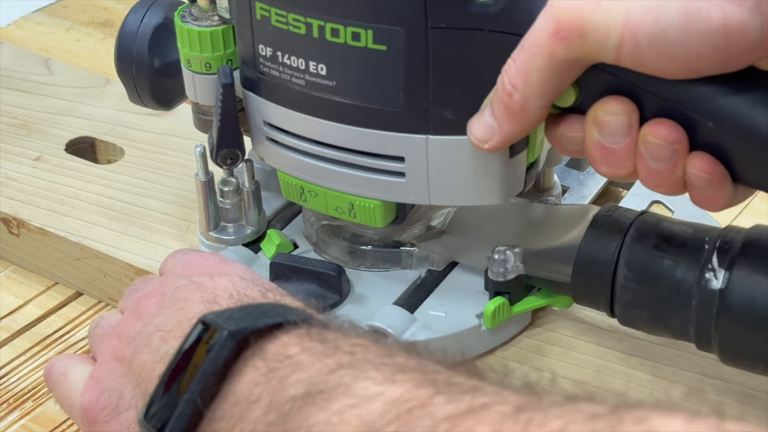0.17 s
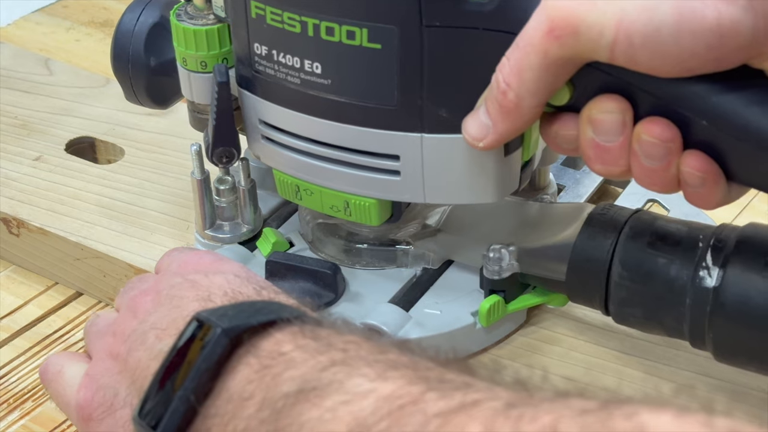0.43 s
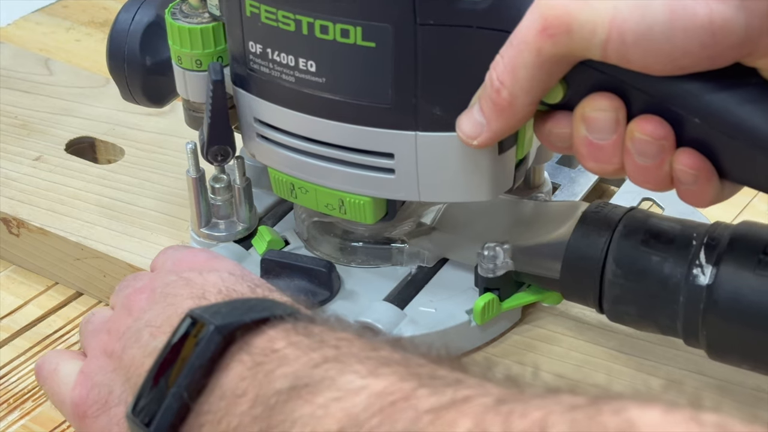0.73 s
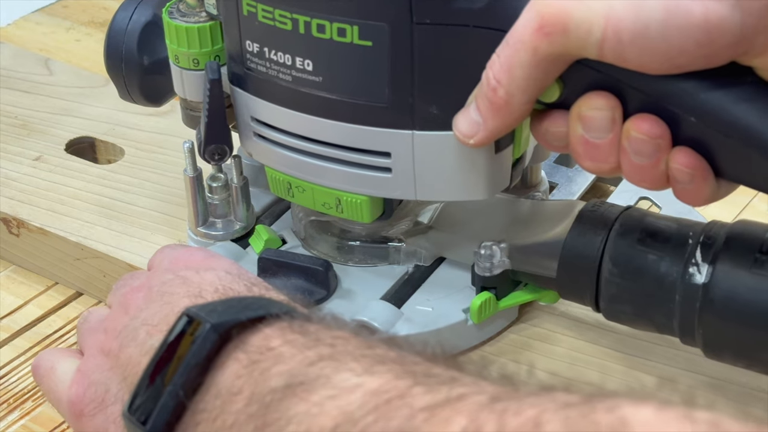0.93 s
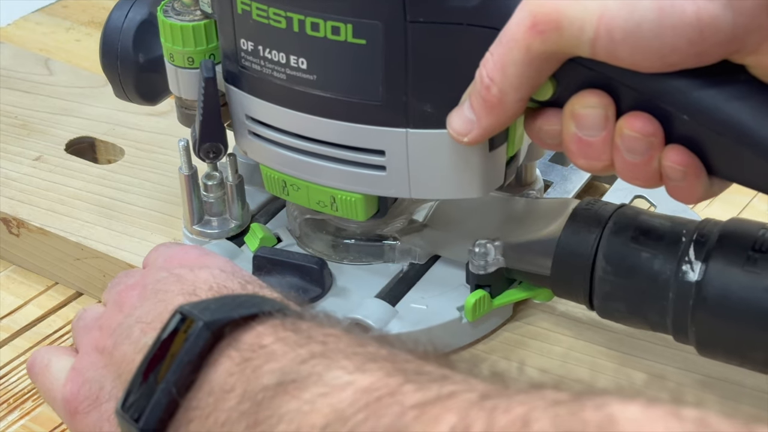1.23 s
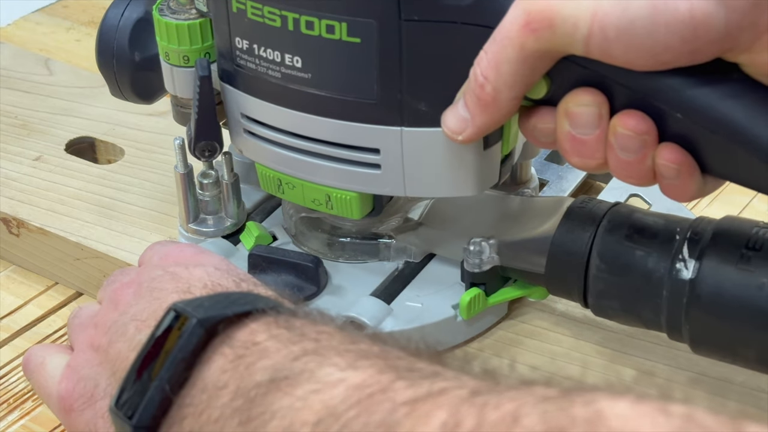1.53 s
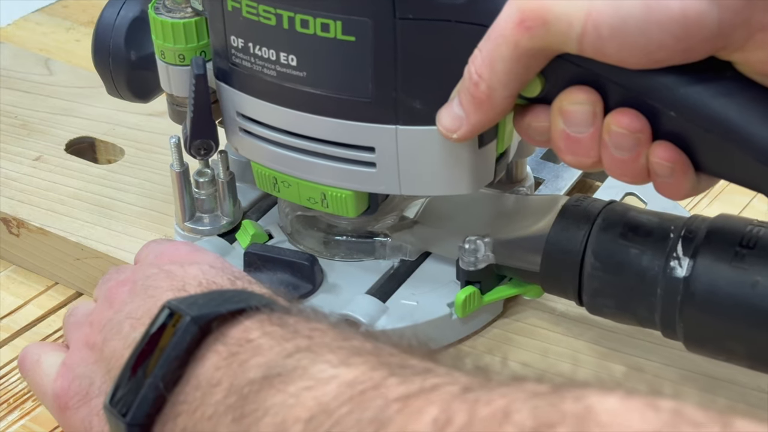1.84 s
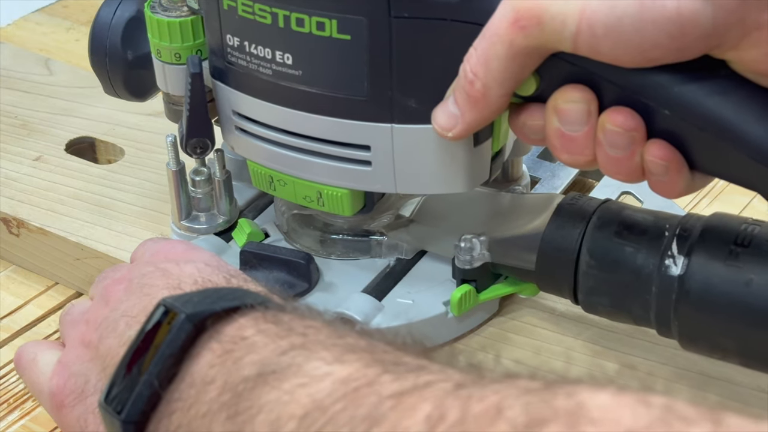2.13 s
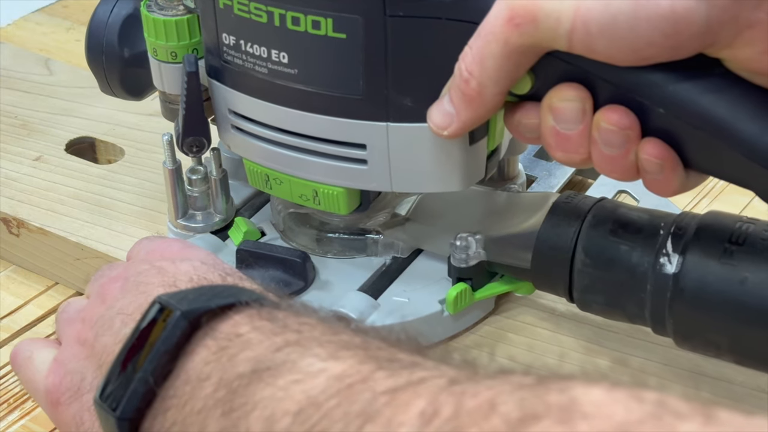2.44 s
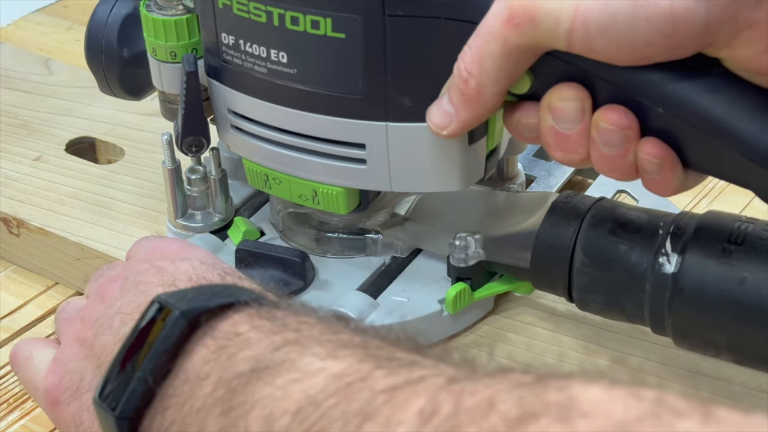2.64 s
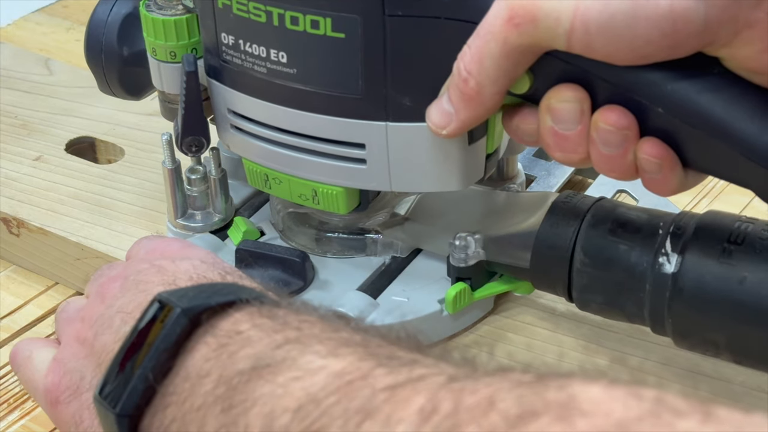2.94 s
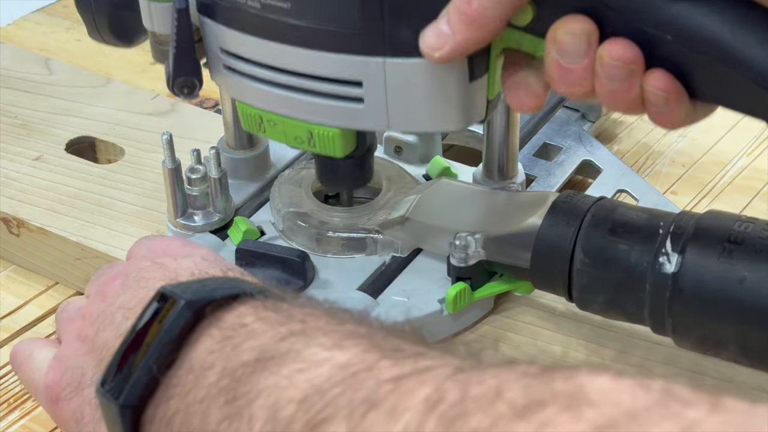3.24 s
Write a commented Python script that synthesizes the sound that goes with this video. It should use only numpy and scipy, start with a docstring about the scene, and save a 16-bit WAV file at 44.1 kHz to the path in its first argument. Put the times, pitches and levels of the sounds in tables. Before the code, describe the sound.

Close up and dry, a wood router shrieks at one high pitch amid cutting hiss. After brief stutters the shriek cuts off; quieter motor whine and rushing air remain, lightly squeaking, then start to sink.

```python
"""Plunge router cutting a slot

Close up in wood, the cutter chatters in a shrill whistle: partials with sidebands at its turning rate.
Shaft orders of motor and bearings sound through housing resonances; extraction air and cutting hiss
are shaped noise. The whistle stutters and stops as the cut ends, two faint ticks sound, and light
grazes bring rough squeaks. The router is then switched off and starts to wind down."""
import sys
import numpy as np
from scipy import signal
from scipy.fft import rfft, irfft
from scipy.io import wavfile

SR = 44100
rng = np.random.default_rng(int(sys.argv[2]) if len(sys.argv) > 2 else 0)


def master(y):
    """Save y as 16-bit WAV."""
    cut = np.clip(np.atleast_2d(y).T, -1, 1)
    pcm = np.round(cut * 32767)  # scale
    wavfile.write(sys.argv[1], SR, pcm.astype(np.int16))


N = 149940
T = np.arange(N) / SR  # time [s]
HZ = np.fft.rfftfreq(N, 1 / SR)  # frequency bins [Hz]

# Feed of the cutter, heard in the whistle: (time [s], strength [dB], pitch [Hz])
FEED_CURVE = [(0, -3, 2131), (.3, -0.26, 2131), (.55, 2, 2127), (.66, 0.13, 2127), (.88, -0.44, 2130),
              (.98, -0.58, 2135), (1.08, 1.5, 2125), (1.2, -0.46, 2126), (1.4, 0.9, 2128),
              (1.72, -0.64, 2129), (2.08, -1.4, 2130), (2.31, -1.5, 2131), (2.39, 0.97, 2125),
              (2.46, 0.9, 2122)]
# Stalls of the whistle: (time [s], depth [dB], nominal half length [s], overshoot [dB])
WHISTLE_STALLS = [(0.864, 2.5, 0.0058, 0), (0.915, 1.5, 0.0088, 1.4), (2.119, 5, 0.0095, 2.5),
                  (2.17, 17, 0.014, 6), (2.211, 10, 0.0094, 3), (2.251, 8, 0.0072, 3),
                  (2.289, 3, .008, 1.5)]
# Partials and cutter sidebands:
# (whistle harmonic [-], added shaft order [-], level at time 0 [dB], change along the cut [dB/s])
WHISTLE_PARTIALS = [(1, 0, 0, 0), (1, -1, -30.5, 0.5), (1, 1, -14.5, -0.9), (1, 2, -29.5, 0.5),
                    (1, 4.13, -24.5, 0), (2, -1, -23.5, -1.5), (2, 0, -13, -1), (2, 1, -29, -3),
                    (2, 2, -40, 5), (3, -1, -27, -1.5), (3, 0, -9.5, -0.54), (3, 1, -21.5, 0.4),
                    (3, 2, -46, -2), (3, 3, -28, 0), (3, 4.02, -14.5, -9), (4, -1, -41, -10),
                    (4, 0, -15.5, -0.5), (4, 4, -27, -2), (5, 0, -14.5, -1.5), (6, 0, -26, -3),
                    (7, 0, -39, 0)]
# Motor and bearing tones: (shaft order [-], cutting [dB], running free [dB], coasting [dB])
SHAFT_ORDERS = [(1, -61.5, -58.5, -57), (2, -64, -55.5, -65), (3, -66, -68, -71), (4, -65.5, -64, -60.5),
                (4.13, -62.5, -63, -61), (5, -81, -73, -65), (6, -84, -55, -57.5), (8, -74, -70.5, -72),
                (8.13, -72, -66, -78), (12, -69, -65, -79)]
# Waver of the whine once the cutter runs free: (time [s], added level [dB])
WHINE_WAVER = [(2.5, -1), (2.6, 0.5), (2.7, 0), (2.76, -10), (2.83, -7), (2.93, 1.5)]
# Housing resonances that the tones slide through: (frequency [Hz], width [Hz], gain [dB])
HOUSING_RESONANCES = [(328, 5, -5), (344, 11, 7.5), (1386, 13, 10), (2170, 35, 3.5)]
# Spectrum of fan and extraction air: (frequency [Hz], relative density [dB per Hz])
AIR_SPECTRUM = [(25, -49), (65, -32.5), (120, -24), (250, -17.5), (400, -14), (700, -9), (1000, -6.5),
                (1300, -12), (1700, -12.5), (2400, -10.5), (3600, -11), (4600, -14.5), (5000, -16.5),
                (5600, -13), (7500, -14), (8700, -11), (10400, -13), (11400, -15), (13400, -28),
                (14700, -17.5), (15500, -21.5)]
# Air resonances in the dust hood: (frequency [Hz], width [Hz], gain on the air noise [dB])
HOOD_RESONANCES = [(1825, 88, 2.5), (2170, 110, 3.5), (3380, 180, 2.5), (6490, 280, 6)]
# Spectrum of the cutting hiss: (frequency [Hz], relative density [dB per Hz])
CUT_SPECTRUM = [(30, -42), (120, -15), (300, -21), (600, -3.5), (1100, -0.5), (2000, -3.5), (3500, -3.5),
                (4300, -6.5), (4750, -2), (5000, 0.5), (5250, -1.5), (6500, -2.5), (8000, -0.3),
                (10500, 0.6), (12000, -10), (13400, -1.5), (15500, -12)]
# Cutting hiss before pulsing and swell: (time [s], level [dB])
HISS_LEVEL = [(0, -45.5), (.4, -42), (1.0, -42.5), (1.5, -44.5), (2.1, -43.5), (2.4, -43)]
# Short noise ticks: (time [s], level [dB])
NOISE_TICKS = [(2.183, -37), (2.439, -45)]
# Grazes of the slot wall after the cut: (time [s], half length [s], level [dB])
WALL_GRAZES = [(2.525, 0.065, -57), (2.668, 0.045, -58), (2.805, 0.0088, -45)]
# Tones of a graze: (frequency [Hz], relative level [dB])
GRAZE_TONES = [(2160, 0.5), (2495, -1)]
# Phase between left and right, opposite in the high treble: (frequency [Hz], lead of left [rad])
LEFT_LEAD = [(300, 0), (560, 0.52), (800, 0.1), (1150, 0.3), (1450, 0), (4650, 0), (4850, -.9),
             (4980, -2.6), (5080, 0), (6850, 0), (7900, -0.98), (10600, -2.4), (10900, -2.95),
             (11400, -3.14), (14500, -3.14), (15500, -3.6)]
# Likeness of the noise in left and right: (frequency [Hz], likeness [0-1])
STEREO_LIKENESS = [(300, 1), (400, .96), (560, .88), (800, .97), (1150, .93), (1450, 1), (4650, 1),
                   (4950, .45), (5120, 1), (5600, .998), (6100, .99), (6400, 1), (6850, .995), (7600, .66),
                   (10600, .64), (11400, 1), (14500, 1), (15400, .55)]

CUT_END_S, CUT_FADE_S = 2.472, 0.0023
OFF_S, POWER_FADE_S = 2.96, 0.029  # switch-off; crossfade to the coasting levels
COAST_S, COAST_DB_PER_S = 4.35, 18  # time constant of the run-down; fade of the motor tones
SHAFT_HZ, FREE_HZ = 363.3, 365.2  # turns a second: cutting at 0 dB strength, and running free
LOAD_HZ_PER_DB = 0.74  # the shaft slows as the cutter bites harder

WHISTLE_DB = -32.5
MAIN_FLUTTER, SIDEBAND_FLUTTER, OVERTONE_FLUTTER = .035, 0.16, 0.14  # share of amplitude
REBOUND_LAG = 1.4  # the overshoot comes this many half lengths after the dip
STALL_SKEW = 0.22  # a stall sets in slowly and ends abruptly
STALL_HZ_PER_DB = 0.94  # pitch dips with each stall and rises with its overshoot
OVERTONE_FOLLOW = 0.54  # share of the whistle's swell that its overtones follow
OVERTONE_DIP, OVERTONE_REBOUND = 1.15, 0.34  # deeper fall and smaller overshoot [dB per dB]

WHINE_ORDER = 6
AIR_DB, AIR_SPEED_DB = -44, 45  # level running free; dB per tenfold shaft speed
CUT_FOLLOW = 0.44  # the hiss follows feed and stalls [dB per dB]
TICK_DECAY_S = 0.0095
GRAZE_ROUGH_RAD = 0.95  # rms phase jitter
EDGE_HZ = 15750


def amp(db):
    """Logarithmic level law: decibels become an amplitude factor."""
    return 10 ** (np.asarray(db) / 20)


def evened(x):
    """Mean-square normalization: the rms becomes 1."""
    return x / np.sqrt(np.mean(x ** 2) + 1e-20)


def follow(curve):
    """Linear interpolation of a curve over time."""
    return np.interp(T, *np.transpose(curve))


def read(points):
    """Interpolation of a spectrum on a logarithmic frequency axis."""
    hz, value = np.transpose(points)
    return np.interp(np.log(HZ + 1), np.log(hz + 1), value)


def resonance_db(table, hz):
    """Resonance: bell-shaped gains in dB, summed around each centre frequency."""
    return sum(db * np.exp(-((hz - centre) / width) ** 2) for centre, width, db in table)


def waver(rate_hz):
    """Low-passed random drift: slow chance motion of rms 1 up to about the given rate."""
    coarse = T[::64]
    hz = np.fft.rfftfreq(len(coarse), coarse[1])
    spectrum = rfft(rng.standard_normal(len(coarse))) / np.sqrt(1 + (hz / rate_hz) ** 4)
    drift = irfft(spectrum, len(coarse))
    return evened(np.interp(T, coarse, drift))


def turns(hz):
    """Phase is the running integral of angular frequency."""
    return 2 * np.pi * np.cumsum(hz) / SR


def any_phase():
    """Random starting phase [rad]."""
    return 2 * np.pi * rng.random()


def spread(shape_db):
    """Partial coherence: shaped noise, partly unlike in left and right."""
    same = np.clip(read(STEREO_LIKENESS), 0, 1)
    spectra = rfft(rng.standard_normal((3, N)))
    pair = np.sqrt(same) * spectra[0] + np.sqrt(1 - same) * spectra[1:]
    return evened(irfft(pair * amp(shape_db), N))


def stall_curve():
    """Stall and rebound: skewed dips of the whistle in dB, each with its overshoot."""
    def bell(centre_s, half_s, skew):
        since = T - centre_s
        return np.exp(-(since / (half_s * (1 + skew * np.sign(since)))) ** 2)

    out = np.zeros(N)
    for time_s, depth_db, half_s, over_db in WHISTLE_STALLS:
        out -= depth_db * bell(time_s, half_s, -STALL_SKEW)
        out += over_db * bell(time_s + REBOUND_LAG * half_s, half_s, STALL_SKEW)
    return out


def whistle(cutting, strength_db, pitch_hz, stall_db, shaft_hz):
    """Chatter with modulation: the turning cutter adds sidebands; the grain shakes each partial."""
    hz = pitch_hz + STALL_HZ_PER_DB * stall_db + 1.66 * waver(rate_hz=44.6)
    tone, spin, out = turns(hz), turns(shaft_hz), np.zeros(N)
    main_db = strength_db + stall_db
    overtone_stall = np.where(stall_db < 0, OVERTONE_DIP, OVERTONE_REBOUND)
    overtone_db = OVERTONE_FOLLOW * strength_db + stall_db * overtone_stall
    for harmonic, order, db, db_per_s in WHISTLE_PARTIALS:
        if harmonic > 1:
            depth, swell_db = OVERTONE_FLUTTER, overtone_db
        else:
            depth, swell_db = SIDEBAND_FLUTTER if order else MAIN_FLUTTER, main_db
        # the complex flutter shakes both amplitude and phase
        flutter = 1 + depth * (waver(rate_hz=19) + 1j * waver(rate_hz=27))
        phase = harmonic * tone + order * spin + any_phase()
        out += amp(db + db_per_s * T + swell_db) * (flutter * np.exp(1j * phase)).real
    return np.sqrt(2) * amp(WHISTLE_DB) * cutting * out


def motor(cutting, shaft_hz):
    """Order excitation: tones locked to the shaft change with load and pass housing resonances."""
    spin, out = turns(shaft_hz), np.zeros(N)
    since_off = np.maximum(T - OFF_S, 0)
    coasting = np.minimum(since_off / POWER_FADE_S, 1)
    for order, cut_db, free_db, coast_db in SHAFT_ORDERS:
        level_db = free_db + (cut_db - free_db) * cutting + (coast_db - free_db) * coasting
        level_db = level_db + resonance_db(HOUSING_RESONANCES, order * shaft_hz)
        if order == WHINE_ORDER:
            level_db = level_db + follow(WHINE_WAVER)
        shake_db = .5 * np.sqrt(order) * waver(rate_hz=15)
        out += amp(level_db + shake_db) * np.sin(order * spin + any_phase())
    return np.sqrt(2) * amp(-COAST_DB_PER_S * since_off) * out


def air(shaft_hz):
    """Flow noise: broadband air, coloured by the hood, grows and eases with fan speed."""
    speed_db = AIR_SPEED_DB * np.log10(shaft_hz / FREE_HZ)
    level_db = AIR_DB + speed_db + 0.23 * waver(rate_hz=60)
    return amp(level_db) * spread(read(AIR_SPECTRUM) + resonance_db(HOOD_RESONANCES, HZ))


def cutting_hiss(cutting, swell_db, shaft_hz):
    """Amplitude-modulated noise: dust and shavings hiss in pulses at the shaft rate."""
    pulse = 1 + 0.17 * np.cos(turns(shaft_hz))
    level_db = follow(HISS_LEVEL) + CUT_FOLLOW * swell_db + 0.5 * waver(rate_hz=12)
    # the hood colours the hiss about half as strongly as the air
    colour_db = read(CUT_SPECTRUM) + 0.54 * resonance_db(HOOD_RESONANCES, HZ)
    return amp(level_db) * cutting * pulse * spread(colour_db)


def ticks():
    """Exponential decay: brief ticks of noise start at once and die away."""
    level = sum(amp(db) * (T >= s) * np.exp(-abs(T - s) / TICK_DECAY_S) for s, db in NOISE_TICKS)
    return level * spread(read(CUT_SPECTRUM))


def squeak():
    """Phase jitter: light grazes of the slot wall bring back rough scraps of whistle."""
    tones = np.zeros(N)
    for hz, db in GRAZE_TONES:
        jitter = GRAZE_ROUGH_RAD * waver(rate_hz=67)
        tones += amp(db) * np.sin(2 * np.pi * hz * T + jitter)
    touch = sum(amp(db) * np.exp(-((T - s) / half_s) ** 2) for s, half_s, db in WALL_GRAZES)
    return np.sqrt(2) * tones * touch


def scene():
    """Superposition: all sources add, then left and right are turned apart in phase."""
    cutting = .5 - .5 * np.tanh((T - CUT_END_S) / (2 * CUT_FADE_S))  # 1 in the cut, 0 after it
    times, strengths, pitches = np.transpose(FEED_CURVE)
    strength_db = np.interp(T, times, strengths)
    pitch_hz = np.interp(T, times, pitches)
    stall_db = stall_curve()

    load_hz = (SHAFT_HZ - FREE_HZ - LOAD_HZ_PER_DB * strength_db) * cutting
    run_down = np.exp(-np.maximum(T - OFF_S, 0) / COAST_S)
    shaft_hz = (FREE_HZ + load_hz) * run_down + 0.36 * waver(rate_hz=5.3)

    tones = whistle(cutting, strength_db, pitch_hz, stall_db, shaft_hz)
    tones = tones + motor(cutting, shaft_hz) + squeak()
    noises = air(shaft_hz) + cutting_hiss(cutting, strength_db + stall_db, shaft_hz) + ticks()
    # half of the lead goes to each side, with opposite sign
    phase_turn = np.exp(.5j * np.outer([1, -1], read(LEFT_LEAD)))
    return irfft(rfft(tones + noises) * phase_turn, N)


def record(dry):
    """Band limitation: a linear-phase low-pass removes the extreme treble."""
    lowpass = signal.firwin(511, EDGE_HZ, window=("kaiser", 9), fs=SR)
    return signal.oaconvolve(dry, lowpass[None], "same")


dry = scene()
out = record(dry)
master(out)
```